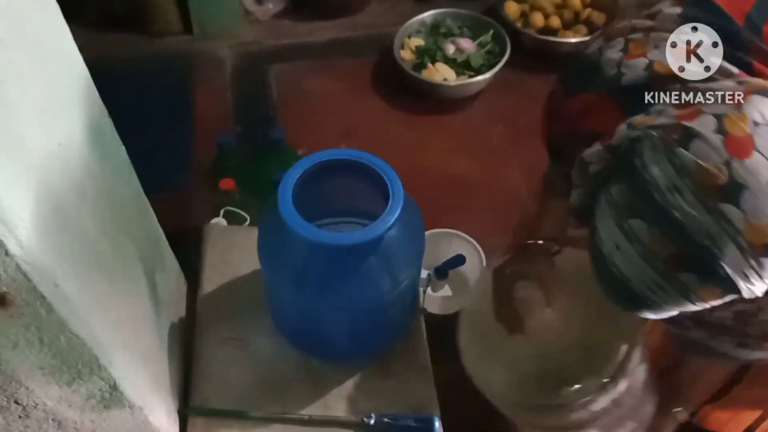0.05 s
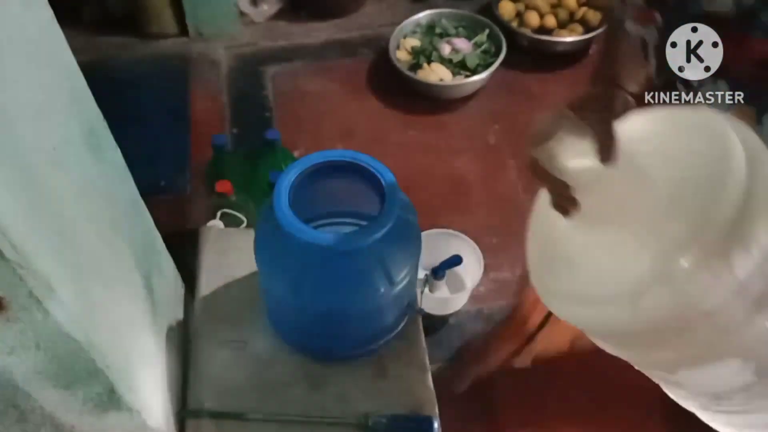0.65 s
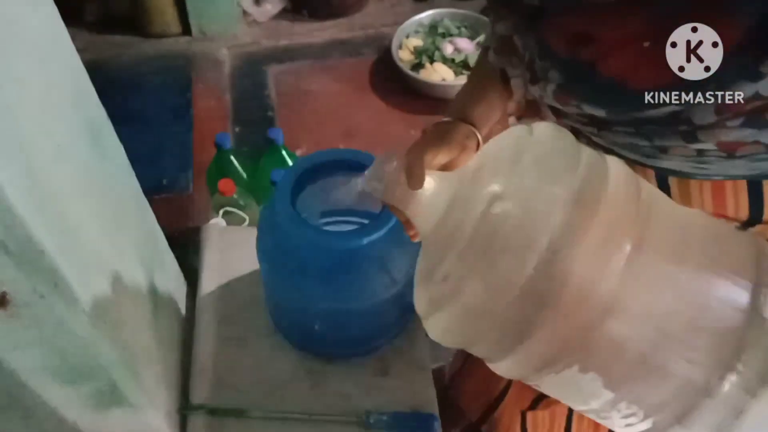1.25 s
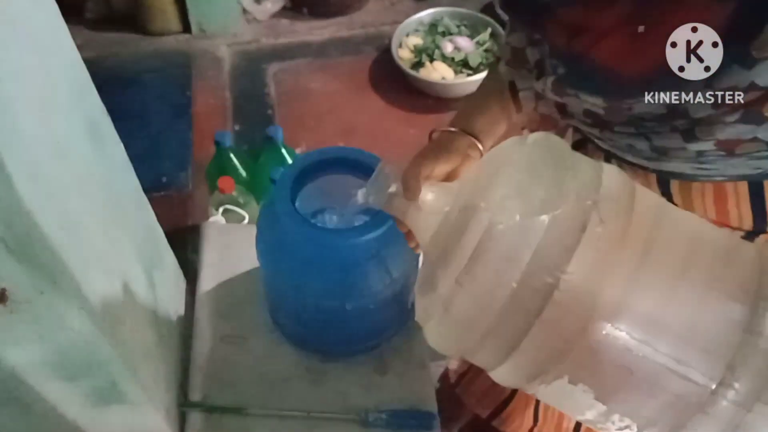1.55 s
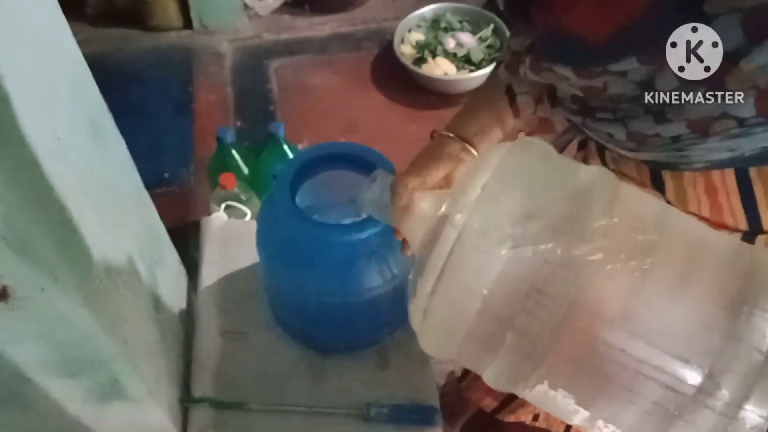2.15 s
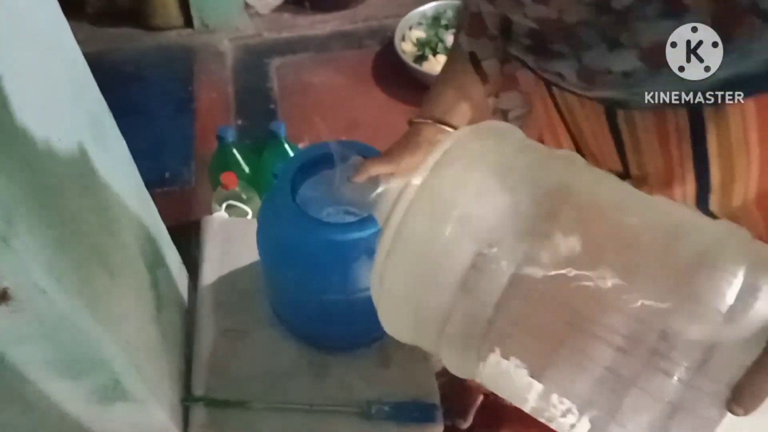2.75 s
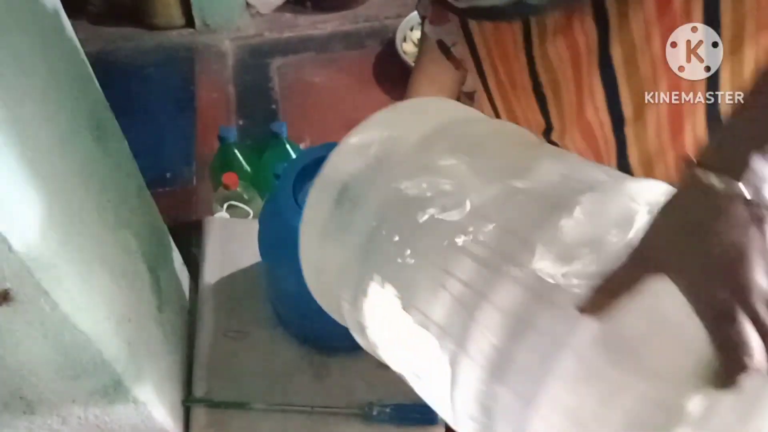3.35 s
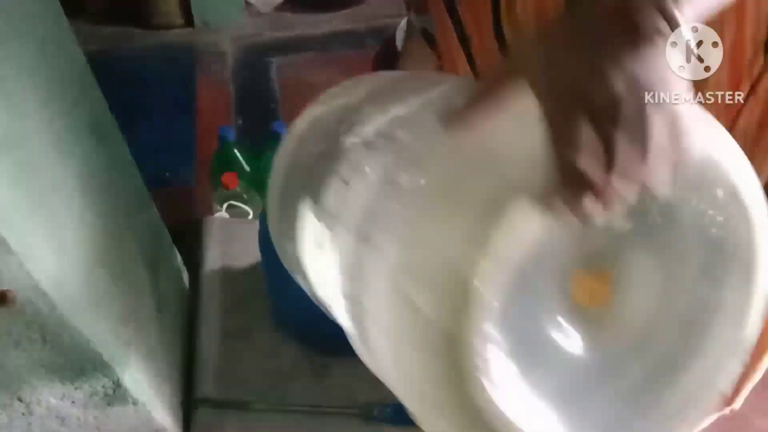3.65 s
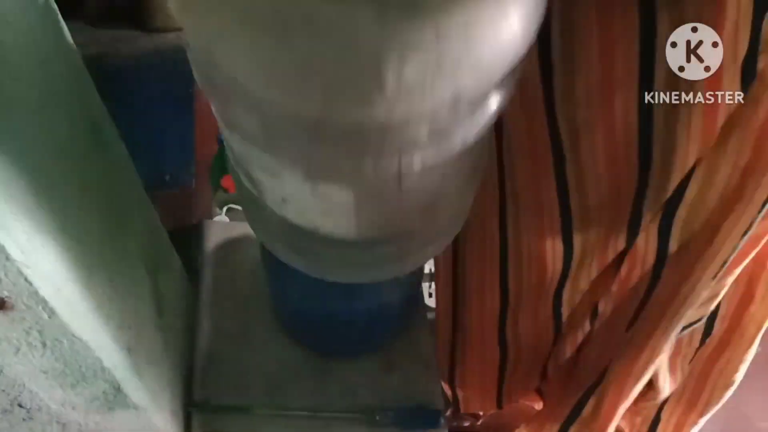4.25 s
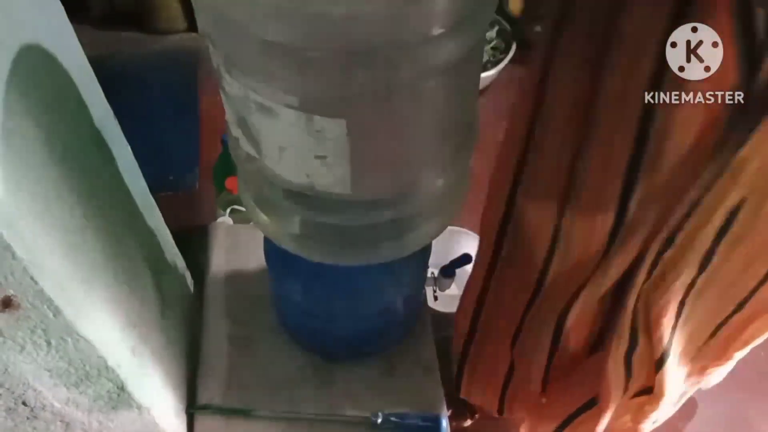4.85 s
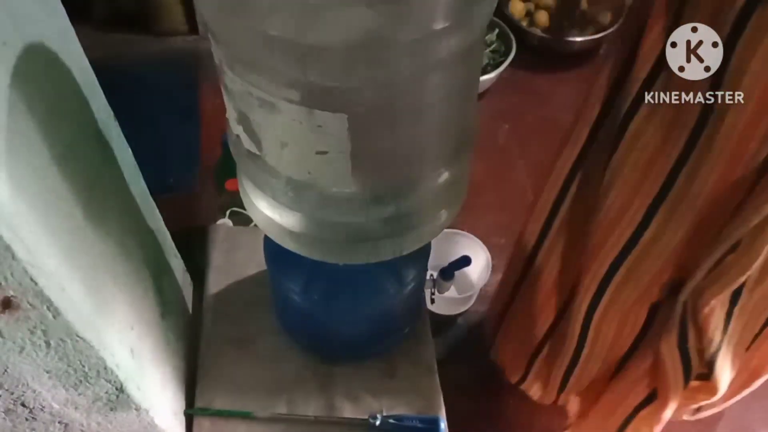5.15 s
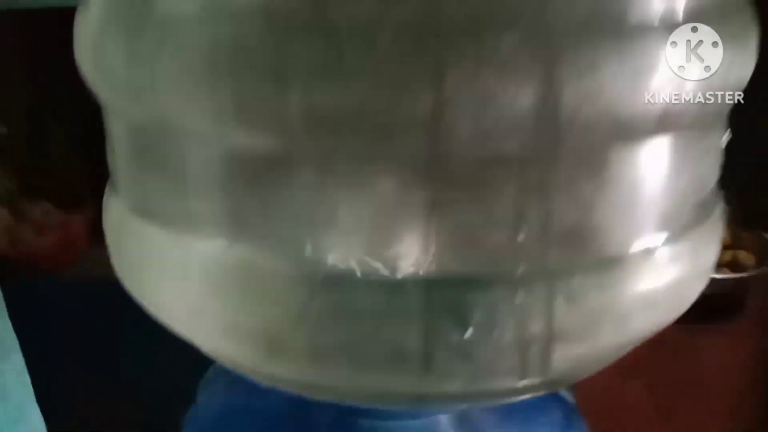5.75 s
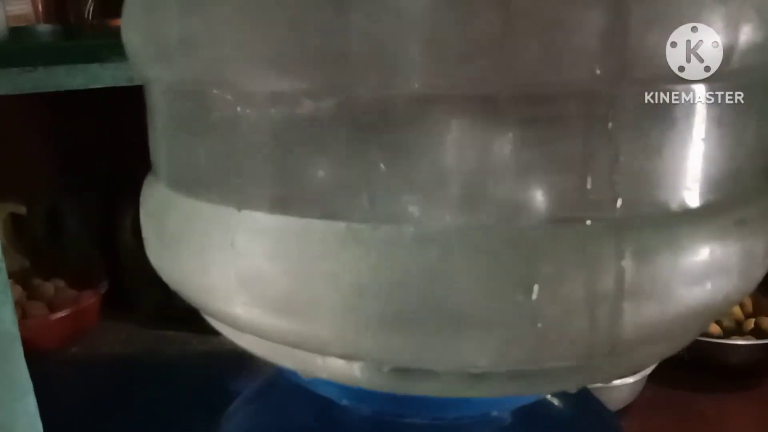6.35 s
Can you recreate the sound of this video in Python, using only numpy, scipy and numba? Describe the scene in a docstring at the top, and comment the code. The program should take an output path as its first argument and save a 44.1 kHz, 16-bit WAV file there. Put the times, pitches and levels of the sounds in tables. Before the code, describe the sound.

Water splashes and glugs out of a big plastic jar, its thin wall snapping, then settles into deep gurgles.

```python
"""Water jar onto a dispenser

A small kitchen, a phone microphone close by. A big plastic water jar is tipped and stood upside down on
a dispenser. Water splashes out in surges, air gulps back through the neck, the thin wall snaps and swarms
of bubbles ring. With the neck under water the spray dies away and air rises in separate deep gurgles."""
import sys
import numpy as np
from scipy import signal
from scipy.fft import rfft, irfft
from scipy.io import wavfile
from scipy.ndimage import uniform_filter1d, map_coordinates
from numba import njit

SR = 44100
rng = np.random.default_rng(int(sys.argv[2]) if len(sys.argv) > 2 else 0)


def bounce(signal):
    """Save signal as a 16-bit WAV file at the path given by the first command-line argument."""
    frames = np.transpose(np.atleast_2d(signal))
    limited = np.clip(frames, -1, 1)
    pcm = np.round(limited * 32767).astype(np.int16)
    wavfile.write(sys.argv[1], SR, pcm)


N = 291357
T = np.arange(N) / SR

# spectrum of the kitchen's still air: (frequency [Hz], relative level [dB])
ROOM_TONE = [(30, -40), (150, 5), (420, 3), (700, -14.5), (1500, -6), (3300, -1), (4600, -73), (7500, -12),
             (15000, -7)]
# response of the phone microphone: (frequency [Hz], gain [dB])
MIC_RESPONSE = [(70, -16), (200, -6.5), (3600, 6), (4700, -2), (5900, -7), (7000, 4), (7900, 2.5),
                (9300, -21), (13000, -24.5), (15500, -18)]
# air resonances of jar and dispenser: (frequency [Hz], width [Hz], gain [dB])
CAVITY_MODES = [(191.6, 4.8, -15), (268, 52, 6.5), (347, 13, -4.5), (430, 29, -4.5)]
# wall resonances that colour the brighter bubbles: (frequency [Hz], width [Hz], gain [dB])
WALL_MODES = [(986, 134, 5), (1540, 140, -1), (2884, 1140, 5.5)]
# modes of one wall panel: (pitch ratio, gain [dB])
PANEL_MODES = [(1, -5), (2.1, -15)]
# strength of the pour, from first tilt until the neck is under water: (time [s], relative level [dB])
POUR = [(0.66, -71), (0.76, -48.5), (0.89, -43), (1.1, -38), (1.89, -42), (3.28, -35), (4.05, -38),
        (4.48, -43.5), (4.58, -45.5), (4.74, -48.5)]
# slugs of water that hit the dispenser at once: (time [s], relative level [dB])
SLOSHES = [(0.91, -38.5), (1.004, -38.5), (2.358, -31), (2.675, -38), (2.751, -39.5), (3.111, -31.5),
           (3.319, -30.5)]
# rushes of air up the jar, in relative levels: (time [s], length [s], churn [dB], splash [dB], heave [dB])
AIR_RUSHES = [(2.106, 0.043, -31.5, -61, -37), (2.2, 0.051, -34.5, -71, -27.5),
              (3.55, 0.18, -38.5, -60, -41), (3.751, 0.17, -36.5, -40, -32),
              (3.987, 0.19, -35.5, -43.5, -28), (4.449, 0.078, -35.5, -45.5, -36),
              (4.804, 0.1, -48.5, -44.5, -34), (5.075, 0.09, -51.5, -49.5, -40.5),
              (5.17, 0.13, -44.5, -40.5, -48), (5.372, 0.16, -38.5, -44.5, -42.5),
              (5.473, 0.092, -35, -45, -47), (5.537, 0.23, -40, -45.5, -56), (5.914, 0.086, -38, -40, -46),
              (6.04, 0.15, -42, -49, -55)]
# how hard the jet plunges into the dispenser: (time [s], gain on the splash [dB])
PLUNGE = [(0.8, -10), (1.45, -5.5), (2.6, -8), (4.55, 1), (4.8, -22)]
# spatter on the dispenser's rim until the jar covers it: (time [s], gain on the spray [dB])
RIM_SPATTER = [(.9, -9), (1.02, -3.5), (3.0, -4.5), (4.2, -4), (4.7, -40)]
# hand and cloth on the jar: (time [s], relative level [dB], pitch [Hz], decay [s])
RUBS = [(0.294, -55, 915, 0.051)]
# spurts of fine spray at the neck: (time [s], level [dB])
SPURTS = [(1.842, -37.5), (3.776, -35.5), (5.282, -38.5)]
# the loudest droplets: (time [s], relative level [dB], pitch [Hz])
DROPS = [(1.1295, -21, 7000), (1.217, -21.5, 7270), (1.3124, -22, 6740), (1.342, -21, 5800),
         (1.384, -22, 7050), (5.426, -32, 6300), (5.525, -22.5, 7220), (5.552, -27, 7440),
         (5.6396, -32.5, 3320), (5.7316, -26, 7260), (5.8197, -23.5, 6670), (6.139, -29, 8150),
         (6.3287, -44, 3130)]
# bubbles breaking the surface: (time [s], relative level [dB], pitch [Hz])
PLOPS = [(0.7123, -28, 1625), (1.46, -26.5, 1420), (1.822, -24, 770), (2.544, -20.5, 1180),
         (3.117, -17.5, 1004), (4.231, -26.5, 1570), (5.235, -27, 760), (5.264, -23, 958),
         (5.485, -22.5, 974), (5.524, -20.5, 1005), (5.578, -23.5, 816), (5.641, -21, 1022),
         (5.736, -29, 1004), (5.989, -28, 1200), (6.025, -21, 930), (6.139, -25, 910), (6.453, -24.5, 984)]
# water hitting the plastic: (time [s], level [dB], pitch [Hz], spray against the slap [dB])
SLAPS = [(1.852, -33, 1980, -2.5), (3.161, -26.5, 1990, -22), (3.246, -25, 5050, -5),
         (3.342, -22.5, 1565, -28), (3.603, -32.5, 1800, -26), (4.082, -31, 2420, -6),
         (5.216, -35.5, 2560, -32), (6.448, -38, 2300, -13)]
# snaps of the jar wall: (time [s], relative level [dB], pitch [Hz], relative spray level [dB])
SNAPS = [(0.771, -29.5, 3050, -42), (0.837, -31, 2640, -43), (0.927, -24.5, 2730, -36),
         (1.016, -24, 1850, -6.5), (1.176, -27.5, 3340, -15), (1.6269, -21, 1760, -19),
         (1.824, -28.5, 2730, -39), (2.0988, -21, 1510, -18), (2.221, -21, 1490, -45),
         (2.352, -12.5, 1450, -18.5), (2.5083, -19, 3310, -18), (2.6713, -14.5, 1527, -40),
         (2.684, -15.5, 1660, -23.5), (2.755, -18, 2220, -24.5), (2.7959, -13.5, 1437, -24),
         (2.8252, -15, 2070, -18.5), (3.007, -18.5, 1640, -26.5), (3.4118, -17, 2520, -47),
         (3.6506, -23, 2120, -45), (4.5258, -22, 2370, -31), (5.406, -26.5, 2240, -29)]
# air pockets breaking up in the dispenser: (time [s], level [dB], pitch [Hz])
GLUGS = [(1.419, -30.5, 412), (1.755, -38.5, 505), (2.14, -27, 403), (2.155, -36, 650), (2.42, -38, 437),
         (2.745, -36, 550), (3.13, -34.5, 560), (3.33, -43, 472), (4.12, -36.5, 690), (4.87, -41, 1050),
         (5.52, -43, 578), (5.605, -39.5, 550), (6.02, -44, 625)]
# gulps of air through the neck: (time [s], relative level [dB], pitch [Hz], time to fall 60 dB [s])
GULPS = [(1.005, -15, 257.3, 0.13), (1.41, -31, 271.5, 0.091), (1.514, -26.5, 234, 0.098),
         (1.744, -28.5, 259, 0.049), (2.002, -22.5, 261, 0.069), (2.129, -19.5, 245, 0.057),
         (2.161, -22, 249, 0.056), (2.16, -21, 140, 0.086), (2.376, -30, 241.5, 0.12),
         (2.437, -23.5, 265, 0.086), (2.576, -22.5, 256, 0.055), (3.115, -19, 264, 0.065),
         (3.128, -16, 333, 0.063), (3.318, -24.5, 241, .12), (3.605, -25, 87, 0.1), (4.739, -20, 167, 0.12),
         (4.844, -25.5, 173.5, 0.092), (4.884, -27, 177, 0.089), (5.393, -33, 281, 0.12),
         (5.576, -20.5, 269, 0.096), (5.85, -31.5, 243, 0.22), (5.876, -25, 188, 0.25),
         (5.951, -26, 190, .07), (5.981, -26, 213.6, 0.23), (6.02, -23.5, 213.5, 0.3),
         (6.096, -28, 220, 0.26), (6.175, -34, 233, 0.21)]

LANDING_S, SEATED_S = 0.98, 4.24  # the water lands; the jar sits in the dispenser
SHIFTS_PER_S = 7  # pace at which reflections and wall resonances wander


def undb(db):
    """Decibels to gain."""
    return 10 ** (np.asarray(db) / 20)


def unit(x):
    """Scale to rms 1."""
    return x / np.sqrt(np.mean(x ** 2))


def gain_curve(table):
    """Gain over time from rows of (time [s], level [dB])."""
    times, db = np.transpose(table)
    return undb(np.interp(T, times, db))


def ramp(start_s, length_s):
    """Rises evenly from 0 to 1."""
    return np.clip((T - start_s) / length_s, 0, 1)


def since(s):
    """Seconds gone by since time s; 0 before it."""
    return np.maximum(T - s, 0)


def wander(per_s):
    """A random value that glides to a new one per_s times a second."""
    points = rng.standard_normal(int(per_s * N / SR) + 2)
    return np.interp(T * per_s, np.arange(len(points)), points)


def add(out, s, x):
    """Mix x into out from time s on."""
    i = max(int(s * SR), 0)
    out[i:i + len(x)] += x[:max(N - i, 0)]


def colour(x, outline):
    """Minimum-phase filter through points of (frequency [Hz], gain [dB])."""
    hz, db = np.transpose(outline)
    size = 4096
    bin_hz = np.arange(size // 2 + 1) * SR / size
    magnitude = undb(np.interp(np.log(bin_hz + 1), np.log(hz), db))
    cepstrum = irfft(np.log(magnitude))
    cepstrum[1:size // 2] *= 2
    cepstrum[size // 2 + 1:] = 0
    impulse = irfft(np.exp(rfft(cepstrum)))
    return signal.fftconvolve(x, impulse)[:len(x)]


def band(x, lo_hz, hi_hz, order=2):
    """Band-pass."""
    sos = signal.butter(order, [lo_hz, min(hi_hz, .45 * SR)], "band", fs=SR, output="sos")
    return signal.sosfilt(sos, x)


def resonate(x, modes):
    """Sum of resonances (frequency [Hz], width [Hz], gain [dB])."""
    return sum(undb(db) * signal.lfilter(*signal.iirpeak(hz, hz / width, fs=SR), x)
               for hz, width, db in modes)


def ping(hz, t60, rise_s, glide):
    """One ringing bubble or wall mode: a sine that swells, dies away and drifts up in pitch."""
    t = T[:int(1.2 * t60 * SR) + 2]
    shape = (1 - np.exp(-(t / rise_s) ** 2)) * np.exp(-np.log(1000) * t / t60)
    return shape / shape.max() * np.sin(2 * np.pi * hz * t * (1 + glide * t / t60 / 2))


@njit
def ring_bubbles(start, hz, cycles, size, glide, n):
    """Many bubbles, each a sine that swells within a few cycles, decays by 60 dB and rises in pitch."""
    out = np.zeros(n)
    for k in range(len(start)):
        length = int(cycles[k] * SR / hz[k]) + 1
        step = 2 * np.pi * hz[k] / SR
        phasor = size[k] + 0j
        turn, bend = np.exp(1j * step - 6.9 / length), np.exp(1j * step * glide / length)
        closed, opening = 1., np.exp(-step / 9)
        for i in range(start[k], min(start[k] + length, n)):
            out[i] += phasor.imag * (1 - closed) ** 2
            closed *= opening
            phasor *= turn
            turn *= bend
    return out


def swarm(per_s, lo_hz, hi_hz, cycles, spread_db, glide):
    """Bubbles of random pitch and strength at random moments."""
    when, pitch, life, loud = rng.random((int(per_s * N / SR), 4)).T
    hz = lo_hz * (hi_hz / lo_hz) ** pitch
    size = undb(-spread_db * np.log(1 - .99 * loud))
    return ring_bubbles((when * N).astype(np.int64), hz, cycles * (.5 + life), size, float(glide), N)


def cluster(hz, spread, cycles, count):
    """A quarter second of bubbles in close succession, within the ratio spread of one pitch; rms 1."""
    when, pitch = rng.random((count, 2)).T
    n = SR // 4
    start = ((np.arange(count) + when - 1).clip(0) * n / count).astype(np.int64)
    pitches = hz * spread ** (2 * pitch - 1)
    return unit(ring_bubbles(start, pitches, np.full(count, float(cycles)), np.ones(count), .1, n))


def steady(x, span_s=0.062):
    """Even out the slow swells of a swarm, so that the flow sets its strength."""
    power = signal.fftconvolve(x ** 2, np.hanning(int(2 * span_s * SR)), "same") / (span_s * SR)
    return x / np.sqrt(np.abs(power) + np.mean(x ** 2) / 1000)


def kitchen(x, wet_db, t60):
    """Direct sound plus a short room tail that loses treble first and shifts as jar and water move."""
    t = T[:SR // 3]
    noise = rng.standard_normal((3, len(t)))
    decay = np.exp(-np.log(1000) * t / t60)
    tails = band(noise, 91, 6240) * decay + band(noise, 3450, 14700) * decay ** 2
    tails *= 1 - np.exp(-(t / 0.003) ** 2)
    tails /= np.linalg.norm(tails, axis=1, keepdims=True)
    echoes = signal.fftconvolve(x[None], tails, axes=1)[:, :N]
    shares = np.array([wander(SHIFTS_PER_S) for _ in tails])
    return x + undb(wet_db) * np.sum(shares * echoes, axis=0) / np.linalg.norm(shares, axis=0)


def shifting_walls(x):
    """Bubbles coloured by the walls; the whole sound slides up and down in pitch as the water moves."""
    read_position = np.cumsum(1 + 0.09 * wander(SHIFTS_PER_S))
    return map_coordinates(x + resonate(x, WALL_MODES), [read_position], order=1, mode="mirror")


def pour_strength():
    """The steady pour: it stirs as the jar is lifted and trickles away once the jar is seated."""
    seated_db = 2 * ramp(SEATED_S, 0.085) - 3 * since(SEATED_S)
    # suction holds the stream back just before each slosh
    hold_db = -2.5 * sum(np.exp(-((T - s) / 0.059 + 1) ** 2) for s, _ in SLOSHES)
    return ramp(0, 0.38) * gain_curve(POUR) * undb(seated_db + hold_db)


def water_motion():
    """Envelopes of churn, heave, bubbling, splash and spray; pour, sloshes and rushes add in power."""
    pour = pour_strength()
    slosh = sum(undb(db) * (1 - np.exp(-since(s) / 0.0063)) * np.exp(-since(s) / 0.11)
                for s, db in SLOSHES)
    pour_churn = undb(-3.5 - 6.5 * ramp(SEATED_S, 0.1)) * pour
    churn = ramp(LANDING_S, 0.065) * np.hypot(pour_churn, undb(-5) * slosh)
    heave = undb(-11) * pour
    splash = np.hypot(undb(-2.5) * pour, slosh)
    # a rush swells, holds while air passes, then dies away; the water it lifts splashes back
    for s, length, churn_db, splash_db, heave_db in AIR_RUSHES:
        swell = ramp(s, 0.037) * np.exp(-since(s + length) / 0.049)
        churn = np.hypot(churn, undb(churn_db) * swell)
        splash = np.hypot(splash, undb(splash_db) * swell)
        heave = np.hypot(heave, undb(heave_db) * swell)
    # bubbles need air, splash and a pool to ring in: they grow as the dispenser fills
    shallow = 1 - ramp(LANDING_S, 1.02)
    bubbling = np.sqrt(churn * splash) * undb(-3 - 11.5 * shallow)
    covered = ramp(LANDING_S, 3.54)  # the jar swings over the opening and shuts the spray in
    spray = splash * undb(-2 - 8.5 * covered)
    return churn, heave, bubbling, splash, spray


def landing_lumps(per_s, fade_s, floor):
    """Water lands in lumps: an envelope that swells at each one and fades back to a floor."""
    when, size = rng.random((int(per_s * N / SR), 2)).T
    hits = np.zeros(N)
    hits[(when * N).astype(int)] = size ** 2
    fading = signal.lfilter([1], [1, -np.exp(-1 / (fade_s * SR))], hits)
    return floor + uniform_filter1d(fading, size=300)


def room_tone():
    """The kitchen's still air, a faint noise behind everything."""
    return undb(-67) * unit(colour(rng.standard_normal(N), ROOM_TONE))


def scuff():
    """Hand and cloth catch and slip unevenly on the jar as it is picked up."""
    out, t = np.zeros(N), T[:SR // 3]
    for s, db, hz, decay_s in RUBS:
        rub = unit(band(rng.standard_normal(len(t)), .75 * hz, 1.3 * hz, order=3))
        add(out, s, undb(db) * rub * (1 - np.exp(-t / 0.0086)) * np.exp(-t / decay_s))
    return out * undb(2.4 * wander(60.5))


def spurts(swell_s=0.015):
    """Fine spray squeezed out between neck and rim: a soft hiss that swells and dies away."""
    out, t = np.zeros(N), T[:SR // 4]
    for s, db in SPURTS:
        hiss = unit(band(rng.standard_normal(len(t)), 5900, 16700))
        add(out, s, undb(db) * hiss * t / swell_s * np.exp(1 - t / swell_s))
    return out


def drops(spray):
    """A droplet ticks, traps a tiny bubble and throws up smaller ones; the spray scatters lesser drips."""
    out, t = np.zeros(N), T[:SR // 20]
    for s, db, hz in DROPS:
        tick = unit(band(rng.standard_normal(len(t)), hz, 2 * hz, order=3)) * np.exp(-t / .006)
        add(out, s, undb(db - 13) * tick)
        add(out, s, undb(db - 8) * ping(hz, t60=65 / hz, rise_s=.0005, glide=.07))
        for late, pitch in rng.random((5, 2)):
            splinter = ping(hz * 1.35 ** (2 * pitch - .7), t60=60 / hz, rise_s=.0004, glide=.07)
            add(out, s + late * 0.02, undb(db - 13) * splinter)
    drips = swarm(per_s=32, lo_hz=6340, hi_hz=9000, cycles=60, spread_db=2.5, glide=.07)
    return kitchen(out + undb(-18) * spray * drips, wet_db=-5, t60=0.22)


def plops():
    """Single bubbles burst in the hollow of the jar."""
    out = np.zeros(N)
    for s, db, hz in PLOPS:
        add(out, s, undb(db - 5.5) * ping(hz, t60=0.031, rise_s=0.00079, glide=0.13))
    return kitchen(out, wet_db=-5, t60=0.18)


def slaps():
    """A lump of water smacks the plastic, bursts into small bubbles at once and flings spray."""
    out, t = np.zeros(N), T[:SR // 4]
    for s, db, hz, spray_db in SLAPS:
        burst = cluster(hz, spread=1.664, cycles=11.6, count=500)
        spray = unit(band(rng.standard_normal(len(t)), 3800, 8800))
        add(out, s, undb(db) * (burst + undb(spray_db) * spray) * np.exp(-t / 0.0088))
    return kitchen(out, wet_db=-4, t60=0.26)


def wall_snaps():
    """Suction flexes the thin wall: a panel snaps through, rings briefly and shakes off spray."""
    out, t = np.zeros(N), T[:SR // 8]
    for s, db, hz, spray_db in SNAPS:
        crack, spray = rng.standard_normal((2, len(t)))
        crack = unit(band(crack, 1080, 3640, order=3)) * np.exp(-t / 0.0026)
        spray = unit(band(spray, 4400, 13900)) * np.exp(-t / 0.014)
        for ratio, mode_db in PANEL_MODES:
            if ratio * hz < 4200:  # the soft plastic rings no higher
                add(out, s, undb(db + mode_db) * ping(ratio * hz, t60=.014, rise_s=.0003, glide=.05))
        add(out, s, undb(db) * (undb(-11.5) * crack + undb(spray_db + 5) * spray))
    return kitchen(out, wet_db=-1.5, t60=0.33)


def stream(bubbling, splash, spray):
    """The falling water drives under bubbles of every size, spatters the rim and throws off a mist."""
    lumps = landing_lumps(per_s=24, fade_s=0.01, floor=0.12)
    large = swarm(per_s=100, lo_hz=370, hi_hz=602, cycles=10, spread_db=5.5, glide=.044)
    middle = swarm(per_s=210, lo_hz=594, hi_hz=1277, cycles=18.7, spread_db=5.5, glide=.25)
    small = swarm(per_s=1150, lo_hz=1250, hi_hz=3700, cycles=17, spread_db=3.4, glide=.1)
    small = lumps * shifting_walls(small)
    rim = lumps * swarm(per_s=2000, lo_hz=3880, hi_hz=6310, cycles=10, spread_db=4, glide=.02)
    fine = lumps * swarm(per_s=750, lo_hz=5800, hi_hz=9000, cycles=24, spread_db=4.8, glide=.05)
    mist = lumps ** 2 * swarm(per_s=900, lo_hz=8450, hi_hz=14500, cycles=20, spread_db=4, glide=.03)
    # each swarm reaches the microphone with its own share of room
    large = steady(kitchen(large, wet_db=-1, t60=0.19))
    middle = steady(kitchen(shifting_walls(middle), wet_db=-2.5, t60=0.26))
    small = steady(kitchen(small, wet_db=-1.5, t60=0.38), span_s=0.066)
    rim = steady(kitchen(rim, wet_db=-7, t60=0.15))
    fine = steady(kitchen(fine, wet_db=-0.5, t60=0.63))
    mist = steady(kitchen(mist, wet_db=2, t60=0.35), span_s=0.15)
    # plunge and rim spatter fade once the jet no longer falls through open air
    jet = gain_curve(PLUNGE) * splash * large + gain_curve(RIM_SPATTER) * spray * rim
    shut_in = undb(-1.5 * ramp(SEATED_S, 0.36))
    fizz = shut_in * (bubbling * middle + undb(-2.5) * splash * small)
    return jet + fizz + spray * (undb(-3.5) * fine + undb(5) * mist)


def glugs():
    """A pocket of air in the dispenser breaks into a handful of large, round-toned bubbles."""
    out, t = np.zeros(N), T[:SR // 4]
    swell = (1 - np.exp(-t / .008)) * np.exp(-t / .026)
    for s, db, hz in GLUGS:
        add(out, s, undb(db) * swell / swell.max() * cluster(hz, spread=1.45, cycles=29, count=30))
    return kitchen(out, wet_db=-8.5, t60=0.21)


def gurgle(churn, heave):
    """Large pockets of air wobble up through the jar and ring its cavity; the water heaves beneath."""
    pockets = swarm(per_s=90, lo_hz=178.8, hi_hz=413, cycles=16, spread_db=1.5, glide=0.15)
    hollow = steady(kitchen(resonate(pockets, CAVITY_MODES), wet_db=-4, t60=0.38), span_s=0.066)
    muffled = ramp(6.2, 0.074)  # the last of the churning turns duller
    hollow = (1 - muffled) * hollow + muffled * band(hollow, 120, 321, order=3)
    thuds = swarm(per_s=70, lo_hz=67.4, hi_hz=176, cycles=4.6, spread_db=-1, glide=0.034)
    rumble = steady(band(thuds, 235, 360, order=1), span_s=0.17)
    return undb(6.5) * churn * hollow + heave * rumble


def gulps():
    """One big bubble at a time pinches off at the neck and wobbles as it rises; the jar rings on."""
    tones, wobbling = np.zeros(N), np.zeros(N)
    for s, db, hz, t60 in GULPS:
        tone = undb(db) * ping(hz, t60=t60, rise_s=0.0051, glide=0.052)
        wobble_onset = np.minimum(T[:len(tone)] / .03, 1)
        add(tones, s - .002, tone)
        add(wobbling, s - .002, tone * wobble_onset)
    tones += .45 * wander(per_s=130) * wobbling
    cavity = undb(-5) * resonate(tones, CAVITY_MODES)
    return undb(2) * kitchen(tones + cavity, wet_db=-6, t60=0.33)


def scene():
    """The water and the flexing jar close up, over the quiet of the kitchen, in mono."""
    churn, heave, bubbling, splash, spray = water_motion()
    background = room_tone()
    rising_air = gurgle(churn, heave) + gulps() + glugs()
    splashing = slaps() + stream(bubbling, splash, spray) + spurts() + drops(spray) + plops()
    jar = wall_snaps() + scuff()
    return (background + rising_air + splashing + jar)[None]


def record(dry):
    """A phone microphone: thin bass, a dip and a peak in the treble, and a steep cut above 15.6 kHz."""
    top_cut = signal.ellip(10, .2, 80, 15600, fs=SR, output="sos")
    return signal.sosfilt(top_cut, colour(dry[0], MIC_RESPONSE))[None]


dry = scene()
out = record(dry)
bounce(out)
```